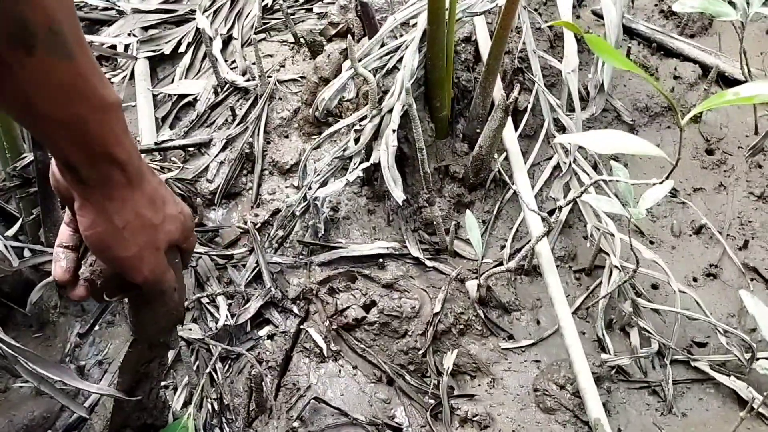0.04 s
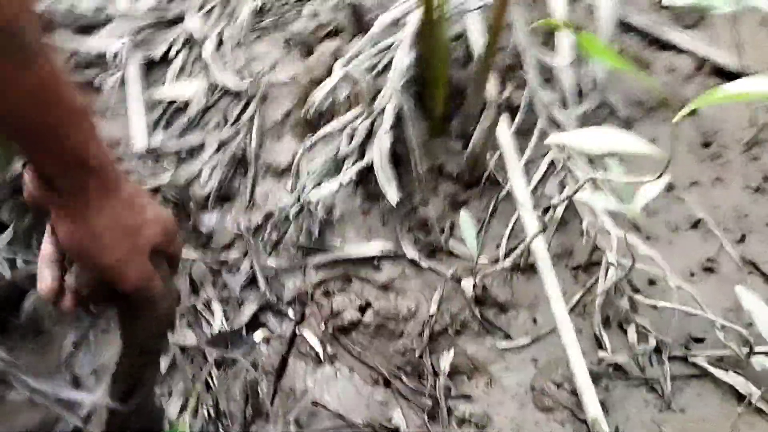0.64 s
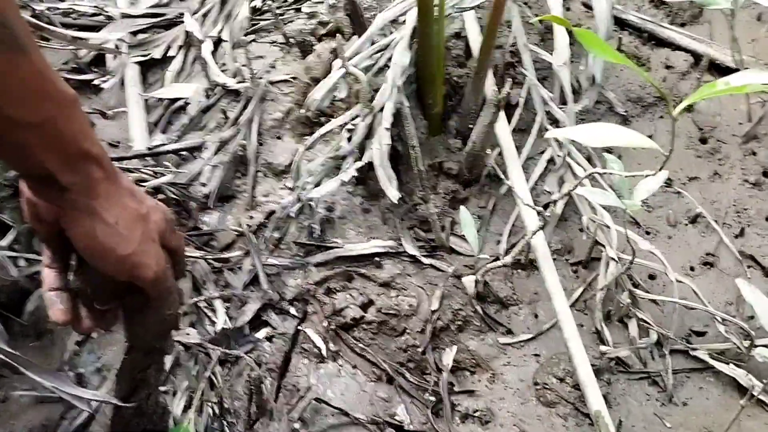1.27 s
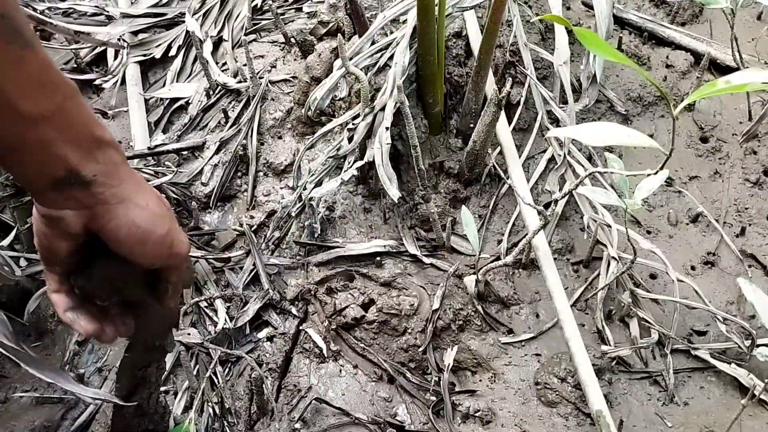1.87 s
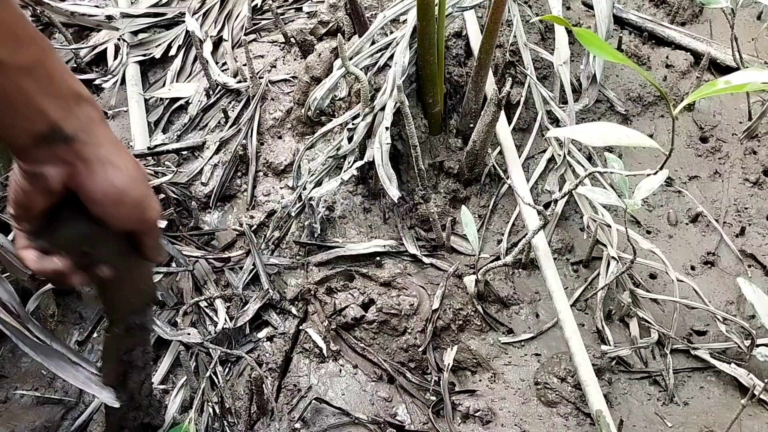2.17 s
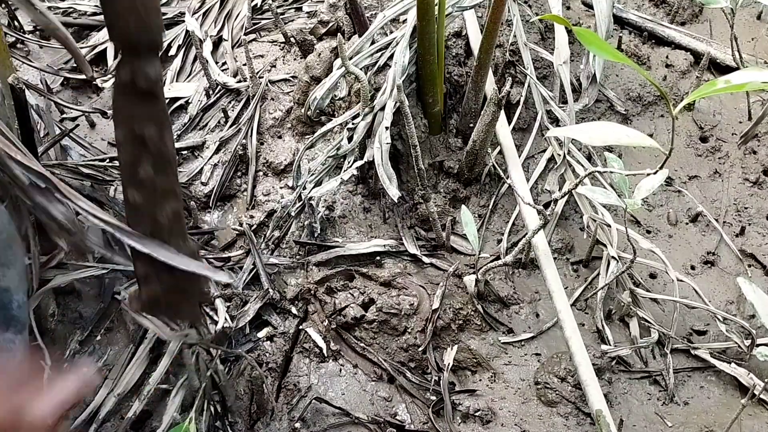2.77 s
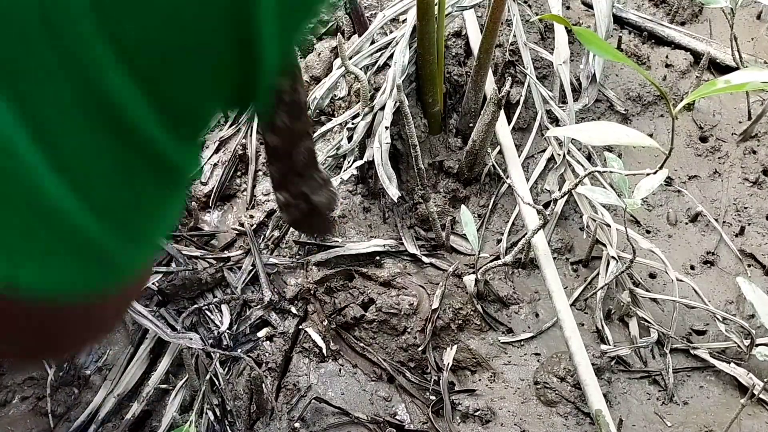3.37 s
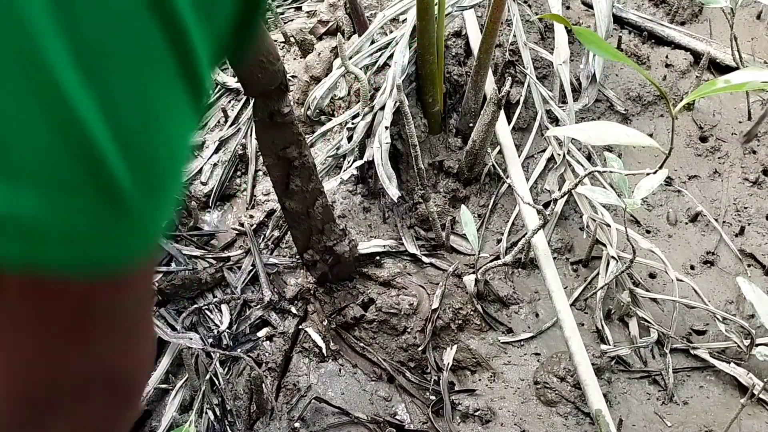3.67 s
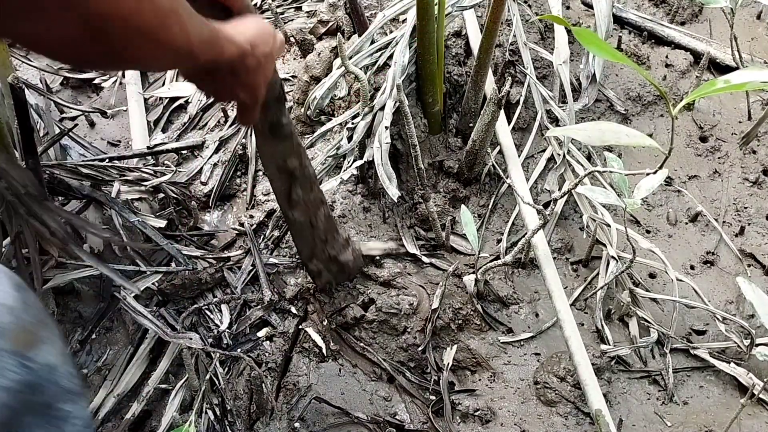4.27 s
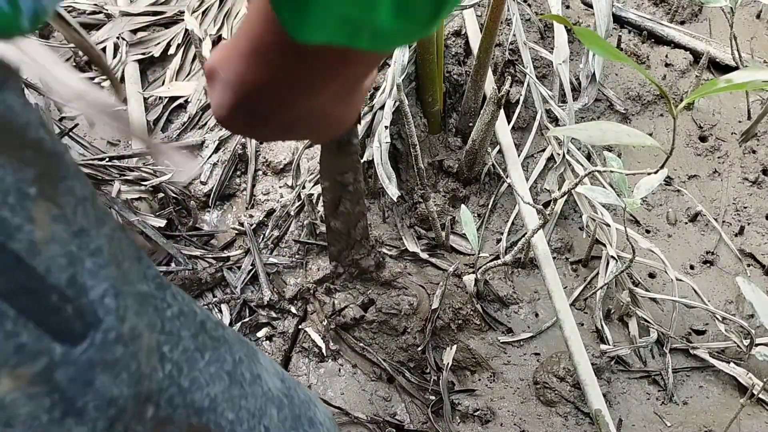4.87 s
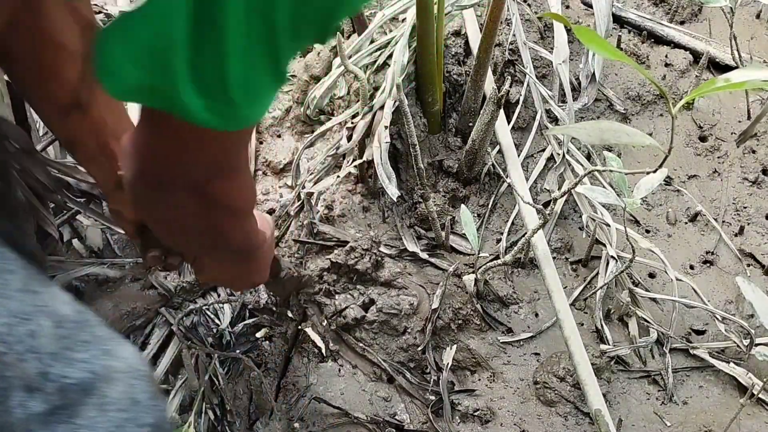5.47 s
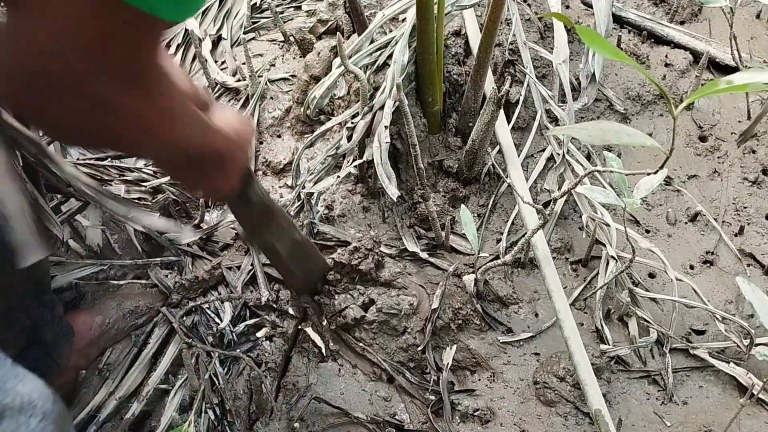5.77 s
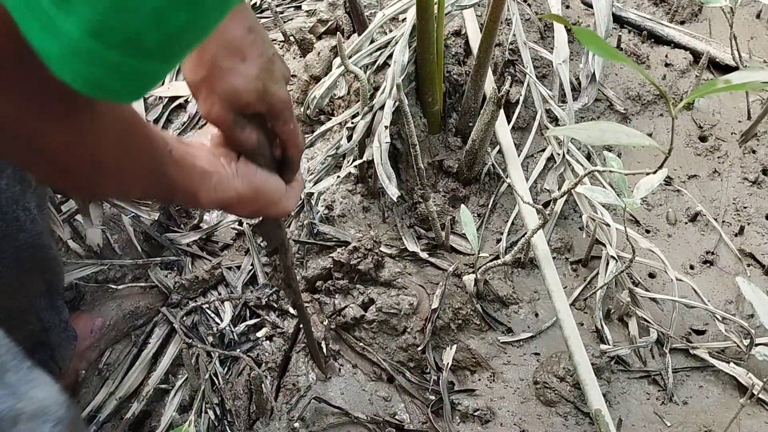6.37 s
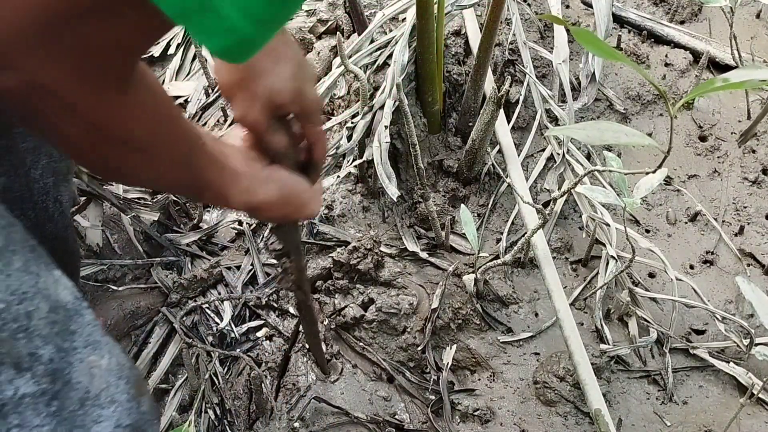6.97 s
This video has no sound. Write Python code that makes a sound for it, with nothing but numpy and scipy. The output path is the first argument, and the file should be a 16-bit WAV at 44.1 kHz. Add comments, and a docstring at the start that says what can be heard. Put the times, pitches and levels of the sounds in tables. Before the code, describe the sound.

Close, crisp cracks and scrapes of a blade cutting roots in swamp mud, with a low outdoor rumble and faint distant birds.

```python
"""A low rumble, a far engine's drone and a distant bird open on a mangrove swamp; more calls follow.
Close to a small stereo microphone, a large knife is worked into wet mud among dry palm litter.
The blade scrapes through grit, stalks and roots snap, and pockets of air pop and squeak in the mud.
The digging is fairly dry, with a little scatter off the ground and a faint echo from the trunks."""
import sys
import numpy as np
from scipy import signal
from scipy.fft import rfft, irfft
from scipy.io import wavfile
from scipy.ndimage import uniform_filter1d

SR = 44100
rng = np.random.default_rng(int(sys.argv[2]) if len(sys.argv) > 2 else 0)


def transcribe(signal):
    """Save signal, clipped to [-1, 1], as a 16-bit WAV file at the path in sys.argv[1]."""
    frames = np.atleast_2d(signal).T
    limited = np.clip(frames, -1, 1)
    pcm = np.round(limited * 32767).astype(np.int16)
    wavfile.write(sys.argv[1], SR, pcm)


N = 310135
TIME = np.arange(N) / SR
BINS = np.fft.rfftfreq(N, 1 / SR)
BAND_LIMIT_HZ = 16200


def amp(db):
    """Decibels to gain."""
    return 10 ** (np.asarray(db) / 20)


def unit(x):
    """Scales to rms 1."""
    return x / np.sqrt(np.mean(x ** 2) + 1e-20)


def fade(t, t60):
    """Exponential decay, 60 dB down after t60 seconds."""
    return np.exp(-np.log(1000) * t / t60)


def read(points, hz):
    """Reads a spectrum on a log-frequency axis."""
    f, value = np.transpose(points)
    return np.interp(np.log(hz + 1), np.log(f + 1), value)


def curves(rows):
    """The columns of a timed table, sample by sample."""
    s, *columns = np.transpose(rows)
    return [np.interp(TIME, s, c) for c in columns]


def add(mix, s, sound):
    """Mixes a sound in at time s."""
    part = mix[..., max(round(s * SR), 0):][..., :sound.shape[-1]]
    part += sound[..., :part.shape[-1]]


def drift(rate_hz):
    """Smooth random wander of rms 1, mostly slower than rate_hz."""
    return unit(irfft(rfft(rng.standard_normal(N)) * np.exp(-(BINS / rate_hz) ** 2), N))


def colour(x, db_at, size=2048):
    """Minimum-phase filter of unit energy with the spectrum db_at(Hz)."""
    hz = abs(np.fft.fftfreq(size, 1 / SR))
    log_gain = np.log(amp(np.maximum(db_at(hz), -100)))
    taps = np.fft.ifft(np.exp(np.conj(signal.hilbert(log_gain)))).real[:size // 2]
    return signal.oaconvolve(x, taps[None] / np.linalg.norm(taps), axes=1)[:, :x.shape[1]]


def cracks(length, per_s, spread_db):
    """Impulses of very unequal size; each reaches the right channel later, at its own strength."""
    out = np.zeros((2, length))
    place, size, sign, side, delay = rng.random((int(per_s * length / SR), 5)).T
    at = (place * (length - 25)).astype(int)
    lag = (12 + 13 * delay).astype(int)
    force = amp(spread_db * np.minimum(-np.log(1 - size), 4)) * np.sign(sign - .5)
    np.add.at(out[0], at, force)
    np.add.at(out[1], at + lag, force * (.5 + side))
    return unit(out)


def grains(per_s, spread_db, width_hz, top_hz, count=24):
    """Small ticks that each ring for an instant at one of count pitches."""
    out = np.zeros((2, N))
    for hz in (np.arange(count) + rng.uniform(0.77, 1, count)) * top_hz / count:
        resonance = signal.iirpeak(hz, hz / width_hz, fs=SR)
        out += signal.lfilter(*resonance, cracks(N, per_s / count, spread_db))
    return unit(out)


def rumble_and_hiss(level_db=-51, swell_db=0.24):
    """A low outdoor rumble, much alike on both sides, with a faint high microphone hiss."""
    # outdoor rumble and microphone hiss: f/Hz, relative density/dB
    spectrum = [(12, -43), (20, -1), (79, -8.5), (113, -8), (138, -10), (222, -16), (388, -24.5),
                (513, -28.5), (590, -29), (1290, -42.5), (1660, -41), (2140, -46), (3070, -43.5),
                (4420, -43), (10500, -64), (12800, -50), (16000, -50)]
    # likeness of left and right: f/Hz, correlation
    likeness = [(25, 0.36), (60, 0.85), (130, 0.92), (260, 0.81), (500, 0.64), (1000, 0.23), (16000, 0)]
    left, other = rfft(rng.standard_normal((2, N)))
    same = read(likeness, BINS)
    right = same * left + np.sqrt(1 - same ** 2) * other
    noise = irfft(np.array([left, right]) * amp(read(spectrum, BINS)), N)
    return amp(level_db) * unit(noise * amp(swell_db * drift(12.5)))


def far_engine(gain_db=-6):
    """An engine a long way off: one low tone, uneven in pitch and level."""
    # course of the drone: t/s, f/Hz, level/dB
    course = [(0, 111.8, -56.5), (.55, 112.6, -47.5), (2.7, 109.5, -45.5), (3.1, 110.4, -52),
              (4.7, 111, -52), (5.55, 114.3, -45.5), (6.3, 114.4, -44.5), (6.6, 113.9, -57),
              (7.03, 111.5, -61)]
    hz, db = curves(course)
    phase = 2 * np.pi * np.cumsum(hz) / SR + .65 * drift(12)
    drone = np.sin(phase) * amp(2.3 * drift(16))
    return amp(db + gain_db) * unit(drone)


def far_birds():
    """Distant birds give single notes, made slightly husky by a fast waver in pitch."""
    # calls: t/s, length/s, start f/Hz, middle f/Hz, end f/Hz, level/dB
    calls = [(0.017, 0.12, 1000, 950, 870, -73), (0.986, 0.24, 2160, 2170, 2202, -76.5),
             (4.194, 0.15, 1012, 921, 870, -70.5), (5.807, 0.18, 823, 761, 732, -60),
             (5.857, 0.081, 1377, 1370, 1370, -69)]
    out, waver = np.zeros(N), 1 + .035 * drift(150)
    for s, length, start_hz, middle_hz, end_hz, db in calls:
        progress = np.linspace(0, 1, int(length * SR))
        hz = np.interp(progress, [0, .5, 1], [start_hz, middle_hz, end_hz]) * waver[:len(progress)]
        note = np.sin(2 * np.pi * np.cumsum(hz) / SR) * signal.windows.tukey(len(hz), .5)
        add(out, s, amp(db) * unit(note))
    return np.array([out, out])


def blade_effort(grip_share=0.22, sag_db=7.5, release_s=.012):
    """Strength of the coarse and the fine scraping: each push takes hold, eases and dies away."""
    # litter stirring under hands and feet between pushes: t/s, level/dB
    stirring = [(0, -82), (.6, -76), (1.5, -75.5), (2.0, -68), (2.45, -52), (3.4, -57), (3.6, -66.5),
                (4.2, -61), (4.5, -56), (5.75, -65), (6.13, -72.5), (6.65, -58), (7.0, -67.5)]
    # pushes through mud and litter: t/s, length/s, level/dB, brightness/dB
    pushes = [(0.215, 0.14, -81, 7), (0.6, 0.4, -84, 7), (1.207, 0.22, -79.5, 7), (1.59, 0.38, -73, 7),
              (1.957, 0.065, -67, -4), (2.116, 0.42, -57.5, -2), (2.5, 0.046, -46, 0), (2.614, .19, -47, 3),
              (2.854, 0.33, -71.5, 10.5), (3.05, 0.043, -49, 2), (3.133, 0.13, -55, 1.5),
              (3.256, 0.23, -55.5, 2.5), (3.757, 0.087, -60, 5), (3.89, 0.14, -46.5, 3.5),
              (3.981, 0.052, -47.5, -1), (4.265, 0.049, -49.5, 3.5), (4.383, 0.043, -50, 2),
              (4.475, 0.51, -59, -6), (4.661, .1, -48.5, -1.5), (4.767, 0.082, -63, 6),
              (5.07, 0.26, -58.5, 1.5), (5.271, 0.26, -53.5, -0.5), (5.609, 0.17, -53, -1.5),
              (5.807, 0.15, -58.5, -1.5), (6.03, 0.02, -57.5, -2), (6.228, 0.089, -61.5, -2),
              (6.332, 0.14, -58.5, 0), (6.536, 0.065, -55, 5.5), (6.68, 0.16, -55.5, 3.5),
              (6.868, 0.025, -56.5, 2)]
    stir_db, = curves(stirring)
    power, t = amp([stir_db, stir_db]) ** 2, np.arange(SR // 2) / SR
    for s, length, db, bright_db in pushes:
        grip = np.minimum(t / (grip_share * length), 1)
        sag = amp(-sag_db * (t / length - .5))
        release = np.exp(-np.maximum(t - length, 0) / release_s)
        add(power, s, (amp([[db], [db + bright_db]]) * grip * sag * release) ** 2)
    return np.sqrt(power)


def blade_scrape(coarse_db=-1, fine_db=-0.04, twigs_db=-9, wet_db=-45, wet_follow=0.46, split_hz=9000):
    """Sand and fibres slip past the blade in clumps, twigs tick, and the wet mud crackles lower."""
    # grit on the blade: f/Hz, relative density/dB
    grit = [(800, -23.5), (1500, -10.5), (3280, -3), (4420, 0), (6630, -2.5), (8240, -8), (10900, 4),
            (12400, 12.5), (16000, 0.5)]
    # wet mud: f/Hz, relative density/dB
    mud = [(120, -23.5), (300, 6), (600, 2.5), (1100, -3), (1900, -10), (3000, -12.5), (6000, -44)]
    # small twigs: f/Hz, relative density/dB
    wood = [(300, -19), (1000, 0.5), (1500, -1), (3500, -3.5), (8000, -6.5)]
    coarse_push, fine_push = blade_effort()
    clumps = unit(amp(2.4 * drift(50)))
    sand = clumps * grains(per_s=9000, spread_db=4.2, width_hz=900, top_hz=BAND_LIMIT_HZ)
    bubbles = clumps * grains(per_s=3000, spread_db=2.5, width_hz=300, top_hz=3000, count=12)
    ticks = grains(per_s=70, spread_db=3, width_hz=1100, top_hz=7000, count=10)
    low_grit = lambda hz: read(grit, hz) - 10 * np.log10(1 + (hz / split_hz) ** 8)
    high_grit = lambda hz: read(grit, hz) - 10 * np.log10(1 + (split_hz / (hz + 1)) ** 8)
    coarse = colour(sand * coarse_push * amp(coarse_db), low_grit)
    fine = colour(sand * fine_push * amp(fine_db), high_grit)
    squelch = colour(bubbles * amp(wet_db) * coarse_push ** wet_follow, lambda hz: read(mud, hz))
    twigs = colour(ticks * coarse_push * amp(twigs_db), lambda hz: read(wood, hz))
    return coarse + fine + squelch + twigs


def stalk_snaps(break_s=0.00093, build_s=0.0038, brittle_s=0.011, gain_db=-0.5):
    """A fibre gives way in one sharp break and a run of smaller splits; a tough one tears gradually."""
    # stalks and roots breaking: t/s, level/dB, crackle t60/s, body/dB, top/dB, left over right/dB
    breaks = [(0.425, -71, .012, 4, 0.5, -6), (0.655, -62, 0.062, 16, 2, 0),
              (0.726, -59, 0.0054, -3, 17, -2), (0.953, -61.5, 0.064, 11, -1, 0),
              (1.45, -64, 0.029, 12, -2, 1), (1.792, -49, 0.061, 10.5, 0, 2.5),
              (2.107, -52, 0.044, -3, -3, 2), (2.334, -41.5, 0.055, 1, -3.5, 0.5),
              (2.392, -29, 0.071, -1, -8.5, 0), (2.528, -38.5, 0.019, 22.5, 6, -0.5),
              (2.605, -25, 0.028, 0, -3, 0), (2.7039, -25.5, 0.037, 0.5, -0.5, 1),
              (2.891, -39.5, .018, -9, 11, -5), (3.04, -44, 0.0068, -29, -9, -2),
              (3.161, -42.5, 0.03, 12.5, 7.5, 1), (3.2537, -40, 0.017, 5.5, -7, 0.5),
              (3.308, -45, 0.055, 12, -16, 3), (3.346, -38, 0.023, 5.5, -6, 0.5),
              (3.452, -42.5, 0.0056, 12, 3, -3.5), (3.499, -44, 0.0018, 2.5, -4, -9.5),
              (3.621, -51.5, 0.009, -23, -3, -2), (3.673, -45.5, 0.042, -6, -10, .5),
              (3.855, -45, 0.094, 6.5, 1, 2), (4.1043, -39.5, .043, 1, 0, -0.5),
              (4.304, -48.5, .012, 16, 2, 2), (4.358, -44.5, 0.029, -4, 2, -2),
              (4.377, -44.5, 0.015, 5, 8, 0), (4.535, -45, 0.024, -0.5, -6.5, 1),
              (4.595, -42.5, 0.0087, 5, 8, -11), (4.727, -42.5, 0.018, 1, -10, -0.5),
              (4.751, -46, 0.03, 29, 8, 2), (4.811, -45, .02, -3, 3, -5), (4.873, -43.5, 0.0053, 13, 4, -2),
              (4.945, -50.5, 0.0061, -3, 1, -11), (5.292, -50, 0.053, 1, -2, -4),
              (5.311, -43.5, 0.023, 0.5, 2, 4.5), (5.492, -49.5, 0.0064, 13, 5, -1),
              (5.623, -47.5, 0.04, 0.5, -5, 0.5), (5.753, -54, 0.0097, 19, 16, 8),
              (6.325, -56.5, 0.018, -1, -2, 5), (6.6522, -46.5, 0.025, -22, 9, 6),
              (6.779, -49, 0.0042, 11, 21, 9), (6.896, -58, 0.015, 6, -4, -6)]
    # dry fibre: f/Hz, relative density/dB
    fibre = [(120, -22), (200, -9), (334, -9), (791, -13.5), (1250, -12), (1400, -10.5), (2470, -7),
             (3560, -6), (4350, -0.5), (6880, -3.5), (8270, -12), (9930, -5), (10900, -11.5), (12800, 1),
             (16000, -4.5)]
    out, t = np.zeros((2, N)), np.arange(SR // 8) / SR
    for s, db, t60, body_db, top_db, pan_db in breaks:
        sharp = 1 / (1 + (t60 / brittle_s) ** 2)  # share of the energy in the first break
        first = unit(rng.standard_normal((2, len(t))) * np.exp(-t / break_s))
        build = 1 - np.exp(-t / (build_s * (1 - sharp) ** 2))
        splits = unit(cracks(len(t), per_s=9000, spread_db=6.5) * build * fade(t, t60))
        burst = np.sqrt(sharp) * first + np.sqrt(1 - sharp) * splits
        burst *= np.sqrt(.02 * SR / len(t))  # the energy of 20 ms at rms 1
        tone = [(2000, body_db), (5000, 0), (12000, top_db)]  # thick stalks sound low, thin ones bright
        snap = colour(burst, lambda hz: read(fibre, hz) + read(tone, hz))
        add(out, s, snap * amp(db + gain_db + np.array([[pan_db], [-pan_db]]) / 2))
    return out


def mud_pops(rise=0.044, rough=0.56, gain_db=-3, follow_db=-7, follow_s=.02, follow_spread=0.13):
    """A soft-walled cavity rings briefly and unevenly, rising as it opens; a weaker one follows."""
    # air pockets opening in the mud: t/s, level/dB, f/Hz
    pockets = [(0.655, -53, 670), (1.756, -49, 2540), (1.998, -47.5, 2670), (2.09, -45, 2830),
               (2.403, -35.5, 305), (2.528, -40.5, 430), (2.607, -35.5, 297), (2.702, -30, 287),
               (2.705, -33, 650), (3.311, -35, 1900), (4.305, -55, 1010), (5.023, -38.5, 1810),
               (5.086, -40, 1770), (5.084, -40.5, 590), (5.108, -37.5, 600), (5.493, -45.5, 1710),
               (6.562, -48, 1630), (6.898, -52, 1150)]
    out, t = np.zeros((2, N)), np.arange(SR // 10) / SR
    attack = 1 - np.exp(-t / 0.0001)
    for s, db, hz in pockets:
        late, detune = rng.random(2)
        follower = (follow_s * (.5 + late), follow_db, hz * (1 + follow_spread * (2 * detune - 1)))
        for wait, weaker_db, f in ((0, 0, hz), follower):
            t60 = 0.038 * (1000 / f) ** 0.24  # larger, lower pockets ring longer
            walls = unit(uniform_filter1d(rng.standard_normal((2, len(t))), size=int(SR / f) + 12))
            turns = f * (t + rise * t * (1 - np.exp(-t / t60)))
            ring = np.sin(2 * np.pi * turns + rough * walls) * (1 + rough * walls / 2)
            add(out, s + wait, amp(db + weaker_db + gain_db) * ring * attack * fade(t, t60))
    return out


def mud_squeak(waver=0.013, whistle_db=-6, hiss_db=-6):
    """Air drawn through a wet slit hisses, and whistles in a few thin, unsteady, very high partials."""
    # mud sucking at the blade: t/s, unheard fundamental f/Hz, level/dB
    suction = [(1.54, 772.4, -71), (1.6, 813, -64), (1.635, 880, -62), (1.685, 890, -63.5),
               (1.74, 865, -60), (1.8, 845, -59), (1.88, 775, -88)]
    hz, db = curves(suction)
    hz *= 1 + .006 * drift(600)
    whistle = np.zeros(N)
    for harmonic in range(15, 19):
        partial_hz = harmonic * hz * (1 + waver * drift(23.5))
        whistle += np.sin(2 * np.pi * np.cumsum(partial_hz) / SR) * amp(1.7 * drift(19))
    slit = [(1200, 7), (3000, 3), (5000, 1), (8000, -22)]  # f/Hz, relative density/dB
    hiss = colour(rng.standard_normal((2, N)), lambda f: read(slit, f))
    sounding = (TIME > suction[0][0]) & (TIME < suction[-1][0])
    return (amp(whistle_db) * unit(whistle) + amp(hiss_db) * hiss) * amp(db) * sounding


def stalk_knocks(spread=0.173, count=9):
    """The edge cuts through a hard stalk; a cluster of its modes rings for a few milliseconds."""
    # cuts through hard stalks: t/s, starting level/dB, centre f/Hz, t60/s
    cuts = [(2.5283, -33, 1100, .009), (2.6057, -18.5, 4650, .016), (2.6098, -21, 4600, .016),
            (3.04, -26.5, 4700, .006), (3.2537, -29, 4300, .006), (4.9455, -28.5, 4300, .006)]
    out, t = np.zeros((2, N)), np.arange(SR // 20) / SR
    for s, db, hz, t60 in cuts:
        modes_hz = hz * (1 + spread * np.linspace(-1, 1, count)[:, None])
        modes = np.sin(2 * np.pi * (modes_hz * t + rng.random((2, count, 1))))
        add(out, s, amp(db) * unit(modes.sum(1)) * fade(t, t60))
    return out


def echo(x, decay, onset_s):
    """A diffuse tail that builds up over onset_s, each band dying at its own speed."""
    hz, t, bands = signal.stft(rng.standard_normal((2, SR * 3 // 4)), SR, nperseg=256)
    tail = signal.istft(bands * fade(t, read(decay, hz)[:, None]), SR, nperseg=256)[1]
    tail *= 1 - np.exp(-np.arange(tail.shape[1]) / SR / onset_s)
    return signal.fftconvolve(x, tail / np.linalg.norm(tail[0]), axes=1)[:, :N]


def scene():
    """Digging close by and fairly dry; birds far off, with more echo from the trees; rumble behind."""
    # scatter off the littered ground: f/Hz, t60/s
    ground = [(200, 0.053), (1500, 0.065), (5000, 0.12), (15000, 0.094)]
    # echo from the trunks: f/Hz, t60/s
    trunks = [(200, 1), (1500, 0.86), (5000, 0.63), (15000, 0.72)]
    knife = stalk_snaps() + stalk_knocks() + mud_pops() + blade_scrape() + mud_squeak()
    birds = far_birds()
    near = knife + amp(-3.5) * echo(knife, ground, onset_s=0.00024)
    near += amp(-14) * echo(knife, trunks, onset_s=0.017)
    far = birds + amp(-4) * echo(birds, trunks, onset_s=0.01)
    return near + far + rumble_and_hiss() + far_engine()


def record(dry):
    """A small stereo microphone: its left port hears more of the top treble; both are band-limited."""
    # balance of the two ports: f/Hz, left over right/dB
    balance = [(60, .5), (400, 1.8), (1300, 0.5), (4400, 1), (8000, -3.5), (11000, 8.5), (15000, 10.5)]
    tilt_db = read(balance, BINS) / 2
    gains = amp([tilt_db, -tilt_db])
    heard = irfft(rfft(dry) * gains / np.sqrt(np.mean(gains ** 2, axis=0)), N)
    lowpass = signal.firwin(401, BAND_LIMIT_HZ, window=("kaiser", 9), fs=SR)
    return signal.oaconvolve(heard, lowpass[None], "same")


dry = scene()
out = record(dry)
transcribe(out)
```